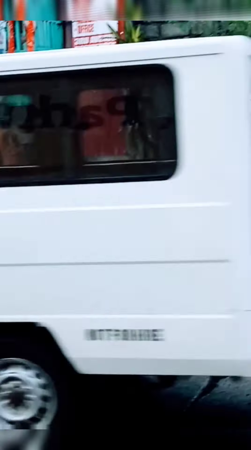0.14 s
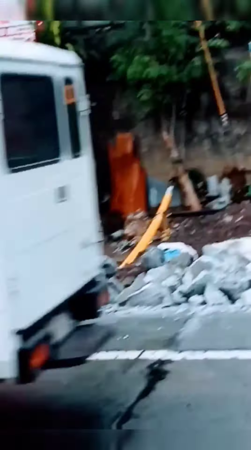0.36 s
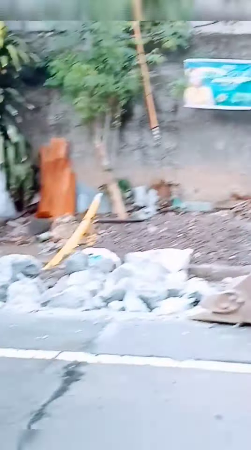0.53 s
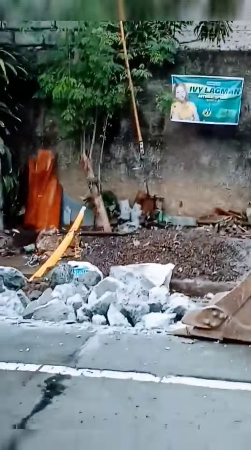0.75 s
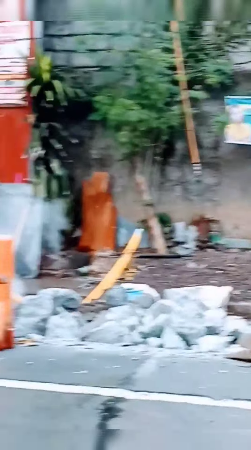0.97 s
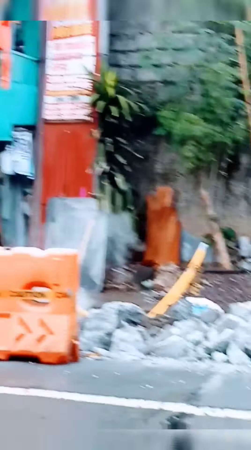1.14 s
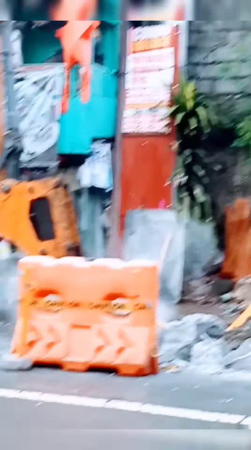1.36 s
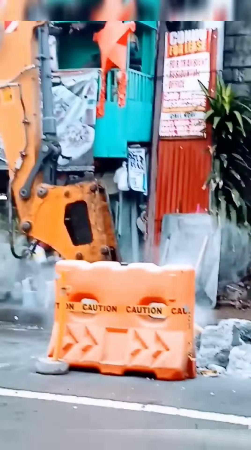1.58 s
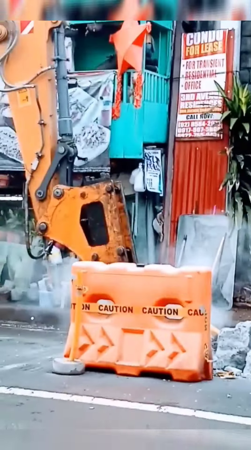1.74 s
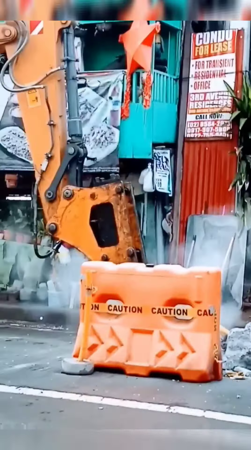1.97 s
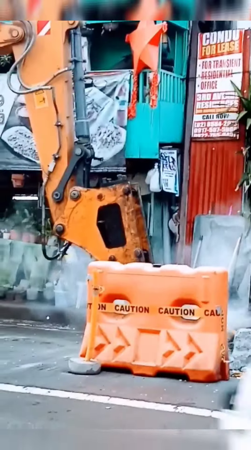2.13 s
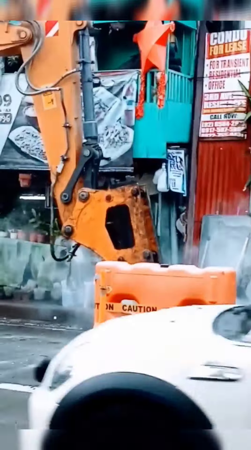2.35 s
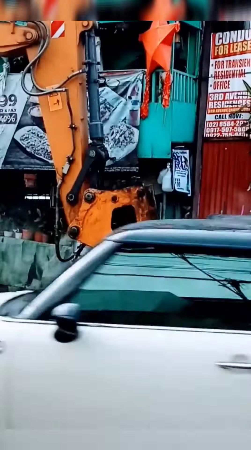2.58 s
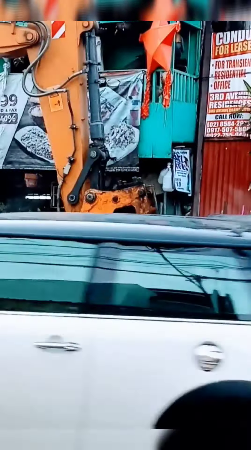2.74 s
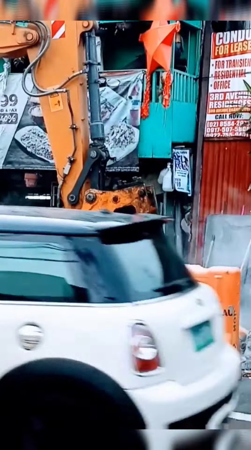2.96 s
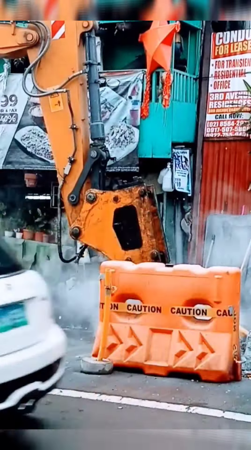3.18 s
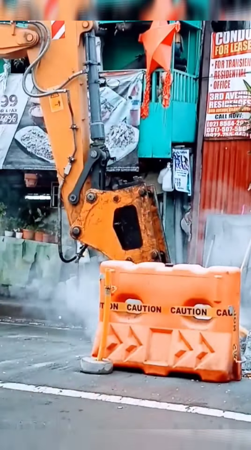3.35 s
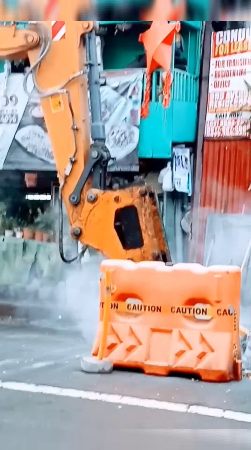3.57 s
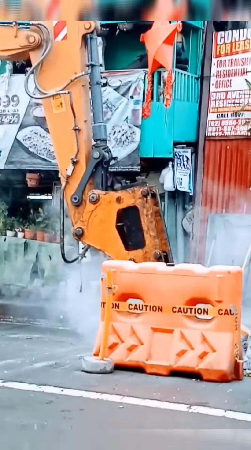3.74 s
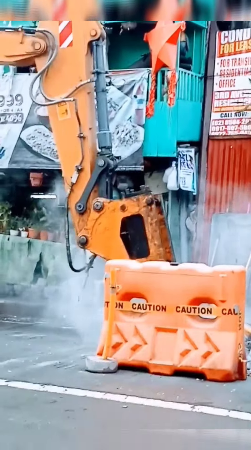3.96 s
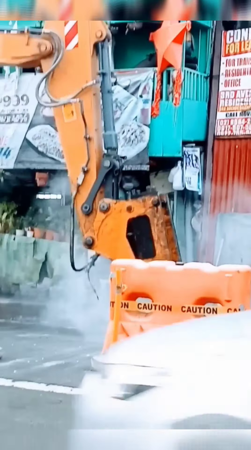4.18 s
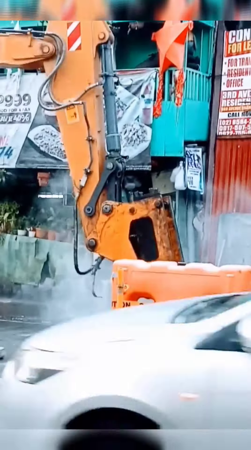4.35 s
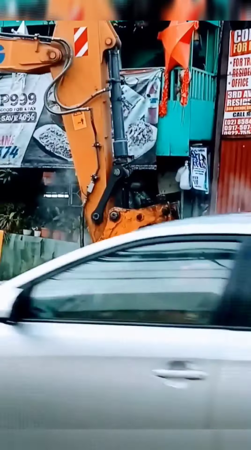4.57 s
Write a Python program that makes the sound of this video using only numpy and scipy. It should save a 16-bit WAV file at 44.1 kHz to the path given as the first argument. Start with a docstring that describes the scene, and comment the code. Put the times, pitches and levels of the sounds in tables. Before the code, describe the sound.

An excavator's hydraulic breaker pounds concrete pavement in five bursts, about nine blows a second, the last very brief. Each blow is a hard crack with a steel clang, a thud and a rattling rebound that echoes in the street. Underneath, a low diesel drones and cars roll past, with a faint brake squeak near the start. A small microphone in the street overloads on the blows.

```python
"""An excavator's hydraulic breaker hammers a concrete pavement in five bursts, about nine blows a second.
Each blow clangs the steel housing, rings the chisel and thumps the slab; then the tool rebounds and
clatters, and the street answers. Underneath, the excavator's diesel drones, cars roll past and a brake
squeaks faintly, with traffic in the distance. One small microphone in the street, overloaded by blows."""
import sys
import numpy as np
from scipy import signal
from scipy.fft import rfft, irfft
from scipy.io import wavfile
from scipy.ndimage import uniform_filter1d

SR = 44100
rng = np.random.default_rng(int(sys.argv[2]) if len(sys.argv) > 2 else 0)


def store_wav(level_fs):
    """Save 16-bit WAV to argv[1]."""
    pcm = np.round(np.clip(np.atleast_2d(level_fs), -1, 1) * 32767)
    wavfile.write(sys.argv[1], SR, pcm.T.astype(np.int16))


N = 252252
TIME = np.arange(N) / SR
AGE = np.arange(SR // 2) / SR  # seconds since a sound began

# Spectrum of clattering steel. Each row: frequency in Hz, relative level in dB.
STEEL_CLATTER = [(300, -14), (560, -8), (740, -6), (1020, .5), (1330, -3.7), (1680, .4), (2100, -5.7),
                 (2600, -6.8), (3300, -13.5), (4200, -16.5), (5500, -47), (8600, -44.5), (10200, -59),
                 (16000, -69)]
# Spectrum of thudding concrete. Each row: frequency in Hz, relative level in dB.
CONCRETE_THUD = [(25, -49), (65, -15), (100, -4.5), (165, 4.5), (215, 5.5), (280, 3.5), (360, 3),
                 (450, 0.5), (600, -5.5), (1100, -15), (6000, -110)]
# Spectrum of engine and road rumble. Each row: frequency in Hz, relative level in dB.
LOW_RUMBLE = [(20, -28), (55, -20), (80, -3.5), (110, 1.5), (170, 0), (230, -5.5), (320, -4.5), (480, -12),
              (750, -44), (5000, -99)]


def amp(db):
    """Decibels to gain."""
    return 10 ** (np.asarray(db) / 20)


def unit(x):
    """Scales to rms 1."""
    return x / np.sqrt(np.mean(x ** 2) + 1e-20)


def add(mix, s, sound):
    """Mixes a sound in at s seconds."""
    part = mix[max(round(s * SR), 0):][:len(sound)]
    part += sound[:len(part)]


def colour(x, spectrum, bright_db=0):
    """Gives x a spectrum, with a broad lift around 3.3 kHz for brightness; rms 1."""
    hz = np.fft.rfftfreq(len(x), 1 / SR) + 1
    corner_hz, corner_db = np.transpose(spectrum)
    shape_db = np.interp(np.log(hz), np.log(np.sort(corner_hz)), corner_db)
    lift_db = bright_db * np.exp(-(np.log2(hz / 3300) / 0.65) ** 2)
    return unit(irfft(rfft(x) * amp(shape_db + lift_db), len(x)))


def smooth_noise(length, rate_hz):
    """A random wander, mostly slower than rate_hz; rms 1."""
    hz = np.fft.rfftfreq(length, 1 / SR)
    return unit(irfft(rfft(rng.standard_normal(length)) / (1 + (hz / rate_hz) ** 4), length))


def onset(rise):
    """A smooth start over about rise seconds."""
    return 1 - np.exp(-(AGE / rise) ** 2)


def until(end):
    """Stays open, then closes softly at end seconds."""
    return np.exp(-(AGE / end) ** 8)


def swell(delay, rise, t60):
    """Envelope of one arrival: a delay, a smooth rise and an exponential decay, all in seconds."""
    age = np.maximum(AGE - delay, 0)
    return (1 - np.exp(-(age / rise) ** 2)) * amp(-60 * age / t60)


def scatter(path, alike, spectrum, bright_db=0):
    """Dense reflections: a share alike is the same at every blow; resonances shift with the tool."""
    paths = rfft(np.sqrt(alike) * path + np.sqrt(1 - alike) * rng.standard_normal(len(AGE)))
    ripple_db = 3 * unit(uniform_filter1d(rng.standard_normal(len(paths)), size=75))
    reflections = colour(irfft(paths * amp(ripple_db), len(AGE)), spectrum, bright_db)
    return reflections / np.std(reflections[:SR // 20])  # the first 50 ms set the level


def ring(modes, detune, pitch=1):
    """Damped modes, struck a little differently each time."""
    out = 0
    for hz, db, t60 in modes:
        struck_hz = hz * pitch * (1 + detune * rng.standard_normal())
        out += amp(db - 60 * AGE / t60) * np.sin(2 * np.pi * (struck_hz * AGE + rng.random()))
    return out


def engine(firing_hz):
    """Exhaust harmonics on an unsteady firing rate, with a puff of noise at each firing."""
    # The exhaust note. Each row: multiple of the firing rate, relative level in dB.
    harmonics = [(1, 4.5), (2, -3.5), (3, -5.5), (4, -12), (6, -13)]
    firings = np.cumsum(firing_hz * (1 + 0.013 * smooth_noise(N, rate_hz=15))) / SR
    note = sum(amp(db) * np.sin(2 * np.pi * (k * firings + rng.random())) for k, db in harmonics)
    puffs = colour(rng.standard_normal(N) * np.exp(-(firings % 1) / 0.12), LOW_RUMBLE)
    waver = amp(0.61 * smooth_noise(N, rate_hz=6.8))
    return waver * (unit(note) + .5 * puffs)


def diesel():
    """The excavator's engine holds its speed, low in the background."""
    return amp(-42.5) * engine(firing_hz=97.7)


def nearness(s, pass_s):
    """Gain of a car driving past the microphone: swells until time s, then fades just as smoothly."""
    squared_distance = 1 + ((TIME - s) / pass_s) ** 2  # 1 at its nearest
    return amp(-20.5 * np.log10(squared_distance))


def traffic():
    """Engine note, rumble and tyre noise swell as each car goes by, over the wash of distant traffic."""
    # Passing cars. Each row: moment nearest the microphone and passing time in seconds,
    # rumble in dB, tyre noise in dB, engine firings per second, engine level in dB.
    cars = [(0.351, 0.71, -20.5, -29.5, 102, -27.5), (2.33, .43, -25.5, -28, 94, -26.5),
            (5.05, .9, -24, -32.5, 99, -29)]
    # Spectrum of tyres on the road. Each row: frequency in Hz, relative level in dB.
    tyre_spectrum = [(200, -15), (650, 3), (1050, 5), (1700, 1), (2700, -5.5), (4100, -14), (5200, -38),
                     (8500, -40.5), (10500, -44.5), (16000, -53)]
    lead_s, doppler = .32, .035  # the engine passes ahead of the tyres, falling in pitch
    engines, rumble_gain, tyre_gain = 0, amp(-37.5), amp(-47.5)  # distant traffic sets the floor
    for s, pass_s, rumble_db, tyre_db, firing_hz, engine_db in cars:
        nose = nearness(s - lead_s, 0.67 * pass_s)
        receding = np.sin(np.arctan((TIME - s + lead_s) / pass_s))
        engines += amp(engine_db) * nose * engine(firing_hz * (1 - doppler * receding))
        rumble_gain = np.hypot(rumble_gain, amp(rumble_db) * nose)
        tyre_gain = np.hypot(tyre_gain, amp(tyre_db) * nearness(s, pass_s))
    tyre_gain *= amp(smooth_noise(N, rate_hz=30))
    rumble = rumble_gain * colour(rng.standard_normal(N), LOW_RUMBLE)
    tyres = tyre_gain * colour(rng.standard_normal(N), tyre_spectrum)
    return engines + rumble + tyres


def brake_squeaks():
    """Out on the road, a passing van's brake pad sings faintly on an unsteady pitch."""
    # Each row: start in seconds, length in seconds, level in dB, pitch in Hz.
    squeaks = [(0.198, .08, -39, 2690), (0.347, 0.074, -37, 2770)]
    out = np.zeros(N)
    for s, length, db, hz in squeaks:
        cycles = np.cumsum(hz * (1 + 0.014 * smooth_noise(len(AGE), rate_hz=130))) / SR
        add(out, s, amp(db) * np.sin(2 * np.pi * cycles) * onset(0.012) * until(length))
    return out


def breaker():
    """In the foreground the piston hits the chisel: crack, clang, thud, rebound, then the street's echo."""
    # Each row: time of a blow in seconds, force on the steel in dB, slab thud in dB,
    # looseness of the chisel's seat from 0 to 1.
    blows = [(.444, -14, -10, 0.66), (.561, -13.5, -12, 0.48), (0.666, -13.5, -12.5, 0.27),
             (.769, -12.5, -13.5, 0.47), (.875, -13.5, -10, 0.28), (.975, -13.5, -10.5, 0.65),
             (1.072, -14.5, -8.5, 0.74), (1.173, -16.5, -7.5, 0.46), (1.28, -17.5, -10, 0.51),
             (2.127, -13, -10.5, 0.3), (2.238, -14, -10.5, 0.16), (2.344, -16.5, -19, 0),
             (2.45, -14.5, -16, 0.1), (2.556, -14, -16, 0), (2.661, -14, -13, .4), (2.759, -16, -14, 0.55),
             (2.859, -19, -17, 0.85), (3.71, -14.5, -7, 0.23), (3.833, -19.5, -6, 0.26),
             (3.943, -18.5, -9.5, 0.4), (4.057, -13, -10.5, 0.25), (4.175, -13, -14, 0.34),
             (4.287, -18, -19, 0.63), (4.535, -13, -12.5, 0.8), (4.669, -14, -11.5, 0.47),
             (4.773, -12.5, -16, 0.74), (4.888, -13.5, -17, 0.76), (5.028, -12.5, -14.5, 0.76),
             (5.369, -12.5, -13.5, 0.29), (5.517, -12.5, -16.5, 0.72)]
    # Each row: start of a burst of blows in seconds, brightness in dB, chisel ring in dB.
    bursts = [(.4, -3, -29), (2.1, -1, -30), (3.7, 1, -25), (4.5, 0, -22.5), (5.3, -0.5, -29)]
    # The steel housing. Each row: mode frequency in Hz, relative level in dB, t60 in seconds.
    housing_modes = [(866, -2, 0.037), (1038.3, -1, 0.093), (1121, -3.5, 0.088), (1288, -12, 0.12),
                     (1634, -5.5, 0.045), (1800, -8, 0.14), (2670, -10.5, 0.046)]
    # The unloaded slab. Each row: mode frequency in Hz, relative level in dB, t60 in seconds.
    slab_modes = [(107.7, -0.5, 0.11), (178.7, -5.5, .14), (290.3, 3.5, 0.094), (442, -5, 0.093)]
    # The slab has cracked and blows carry less far down the street. Each row: start and end in seconds.
    cracked_spans = [(.93, 1.4), (2.72, 3), (4.15, 4.4)]
    slab_pitch = 0.95  # the tool's weight lowers the slab's modes
    out = np.zeros(N)
    tip, stop, casing, street, ground = rng.standard_normal((5, len(AGE)))
    for s, force_db, thud_db, loose in blows:
        _, bright_db, chisel_db = [burst for burst in bursts if burst[0] < s][-1]
        force = amp(force_db)
        # the housing shudders as the piston comes down
        shudder = amp(-3) * scatter(casing, 0, STEEL_CLATTER) * swell(0, .01, 0.18) * until(0.011)
        add(out, s - .01, force * shudder)
        crack = tip_crack(tip, bright_db)
        # a loose seat muffles the clang
        clang = amp(11.5 - 18 * loose) * ring(housing_modes, detune=0.017) * onset(0.0018)
        add(out, s, force * (crack + clang) + amp(chisel_db) * chisel())
        add(out, s + .02, force * rebound(stop, casing, bright_db, loose))
        cracked = any(start < s < end for start, end in cracked_spans)
        echo = scatter(street, 0.13, STEEL_CLATTER, bright_db) * swell(0.033, 0.017, 0.34)
        add(out, s, force * amp(0 if cracked else 3.5) * echo)
        # the slab moves just before the steel rings, and again as the tool drops back, harder if loose
        drop_db = thud_db - 6.5 + 9.5 * loose
        thump = ring(slab_modes, detune=0.022, pitch=slab_pitch) * onset(0.0059)
        drop = ring(slab_modes, detune=0.028, pitch=slab_pitch) * onset(0.0099)
        add(out, s - .004, amp(thud_db + 1.5) * thump)
        add(out, s + .022, amp(drop_db - 0.5) * drop)
        boom = amp(thud_db - 2.5) * swell(0, 0.0032, 0.23)
        boom += amp(drop_db - 3) * swell(0.022, 0.0075, 0.34)
        add(out, s, boom * scatter(ground, 0.35, CONCRETE_THUD))
    return out


def tip_crack(path, bright_db):
    """The hard, noisy crack of a blow at the chisel's tip."""
    # The crack's spectrum. Each row: frequency in Hz, relative level in dB.
    spectrum = [(300, -37), (600, -4), (1000, 5), (1350, -1), (1750, 3), (2700, -4.5), (4100, -11),
                (5300, -37.5), (8500, -48), (10500, -48), (16000, -75)]
    return amp(4.5) * scatter(path, 0.5, spectrum, bright_db) * swell(0, 0.0042, 0.19)


def chisel():
    """The chisel's thin ring flutters as it shakes in its bushing, and dies after about 0.14 s."""
    # Each row: mode frequency in Hz, relative level in dB, t60 in seconds when ringing freely.
    modes = [(3960, 2, 0.61), (4300, -21, 0.33), (4700, -8, 0.3), (6100, -31, 0.49), (7458, -17.5, 0.68),
             (8150, -32, .3), (9000, -23, 0.37)]
    ringing = 0
    for mode in modes:
        partial = ring([mode], detune=0.00092)
        flutter = 0.27 + 0.33 * smooth_noise(len(AGE), rate_hz=46)
        ringing += partial * flutter
    return ringing * onset(0.00051) * until(0.14)


def rebound(stop, casing, bright_db, loose):
    """The tool bounces back, knocks against its stop and rattles in the casing, longer on a loose seat."""
    knock = scatter(stop, 0.23, STEEL_CLATTER, bright_db) * swell(0.0056, 0.0015, 0.036)
    rattle = scatter(casing, 0.36, STEEL_CLATTER, bright_db) * swell(0, 0.0051, 0.66)
    return amp(4) * (knock + rattle * until(.02 + 0.03 * loose))


def rattles():
    """Between blows the loose chisel clatters and broken concrete shifts with a thud."""
    # Each row: start in seconds, clatter in dB, length in seconds, thud in dB.
    shifts = [(.952, -19, 0.027, -28), (2.299, -13, 0.026, -29), (3.272, -31.5, 0.051, -55),
              (4.024, -11.5, 0.081, -13), (4.614, -13, 0.079, -11), (4.738, -13.5, 0.033, -11),
              (5.239, -33, .056, -37), (5.592, -14.5, .016, -18)]
    out = np.zeros(N)
    for s, clatter_db, length, thud_db in shifts:
        steel = amp(clatter_db) * colour(rng.standard_normal(len(AGE)), STEEL_CLATTER)
        concrete = amp(thud_db) * colour(rng.standard_normal(len(AGE)), CONCRETE_THUD)
        envelope = swell(0, 0.0065, 0.31) * (0.056 + until(length))  # a faint tail lingers
        add(out, s, envelope * (steel + concrete))
    return out


def loose_slab():
    """A freed piece of concrete knocks hollowly against its bed."""
    # Each row: start in seconds, level in dB, frequency of the upper mode in Hz.
    knocks = [(2.755, -5.5, 347), (2.786, -13, 387), (2.855, -7, 385), (2.887, -7.5, 317)]
    out = np.zeros(N)
    for s, db, hz in knocks:
        modes = [(hz, db, .13), (0.744 * hz, db, .1)]
        add(out, s, ring(modes, detune=0.01) * onset(0.0066))
    return out


def scene():
    """The roadworks and the traffic behind them, in mono from one spot in the street."""
    return (breaker() + loose_slab() + rattles() + diesel() + traffic() + brake_squeaks())[None]


def record(dry):
    """The small microphone clips hard on the blows, spitting treble; then DC blocking and a band limit."""
    clipped = np.clip(dry, -.695, .695)
    dc_blocked = signal.lfilter(*signal.butter(1, 4, "high", fs=SR), clipped)
    band_limit = signal.firwin(511, cutoff=15900, window=("kaiser", 9), fs=SR)
    return signal.oaconvolve(dc_blocked, band_limit[None], "same")


dry = scene()
out = record(dry)
store_wav(out)
```